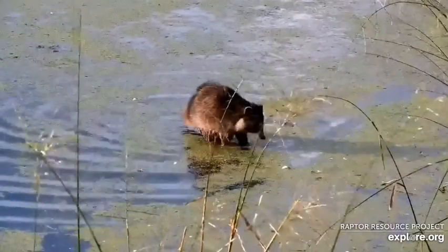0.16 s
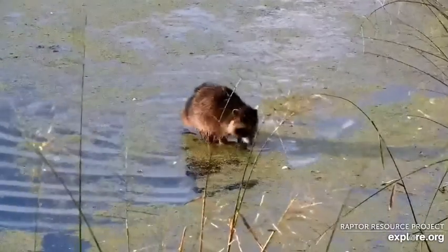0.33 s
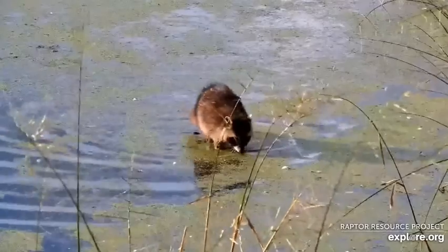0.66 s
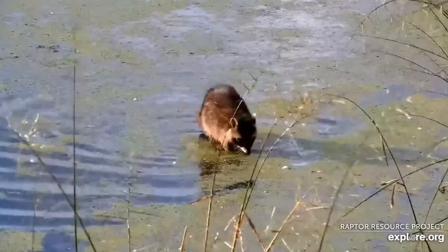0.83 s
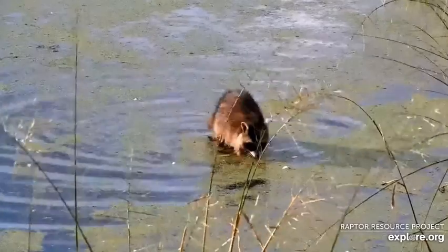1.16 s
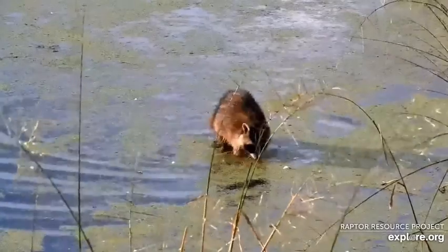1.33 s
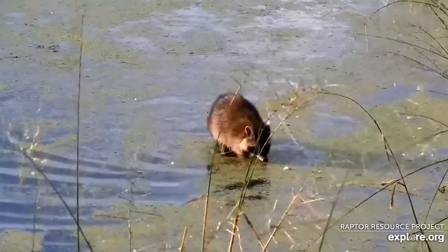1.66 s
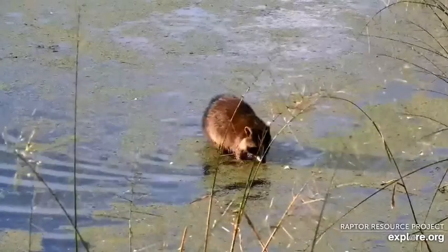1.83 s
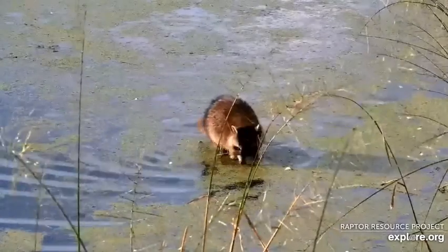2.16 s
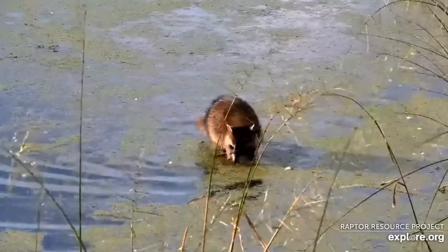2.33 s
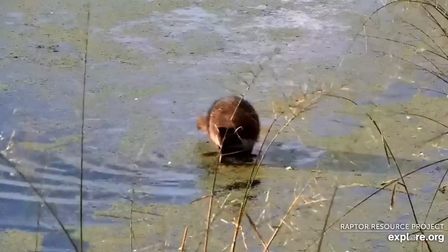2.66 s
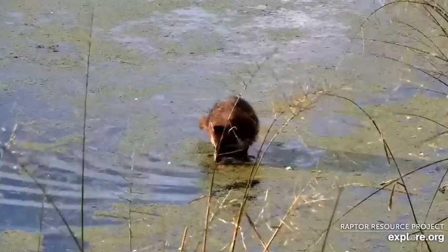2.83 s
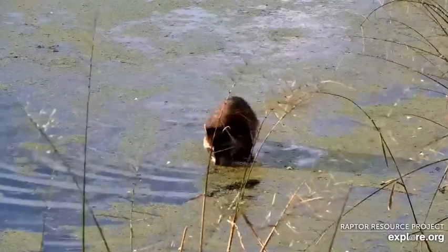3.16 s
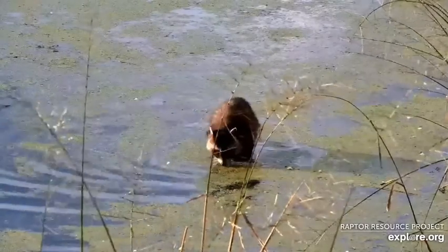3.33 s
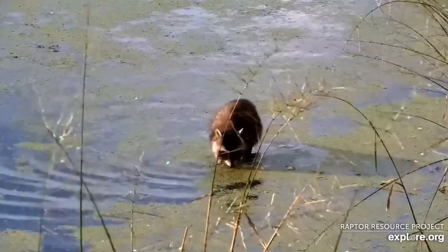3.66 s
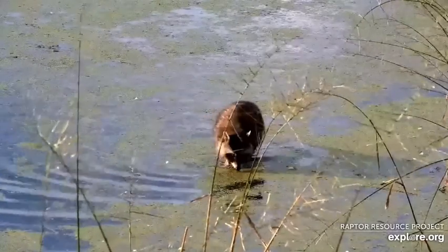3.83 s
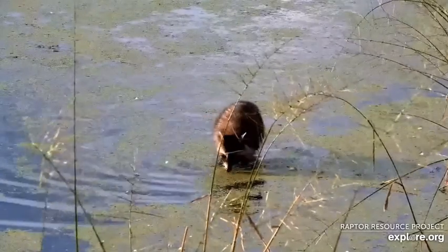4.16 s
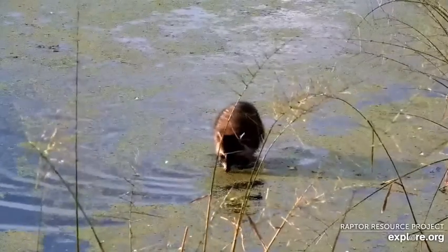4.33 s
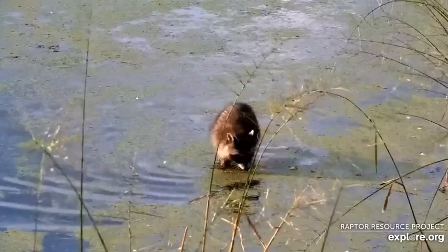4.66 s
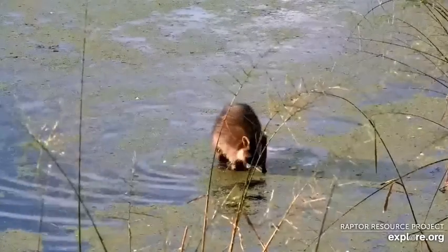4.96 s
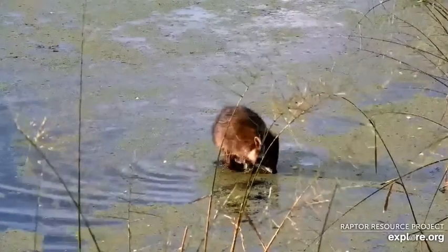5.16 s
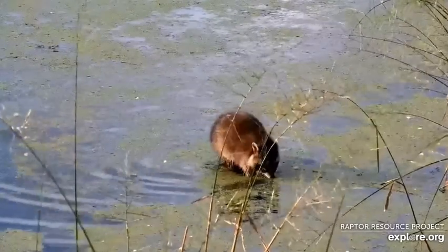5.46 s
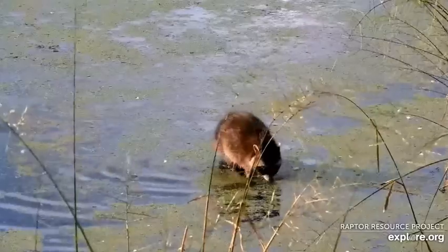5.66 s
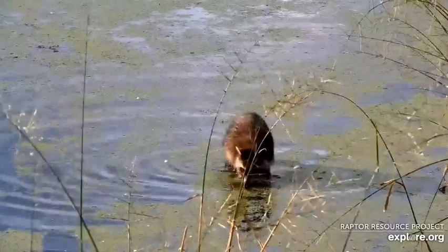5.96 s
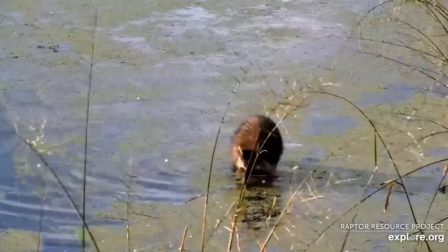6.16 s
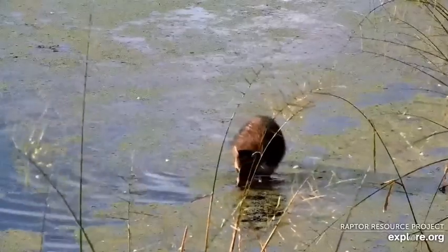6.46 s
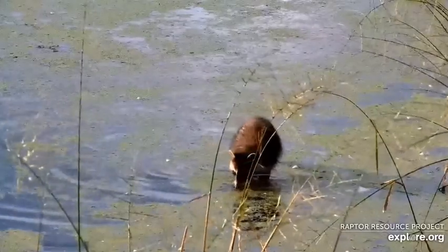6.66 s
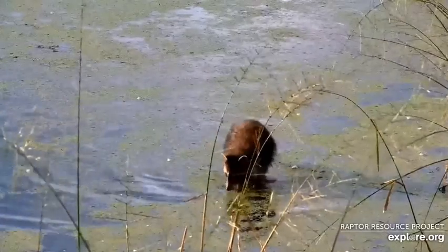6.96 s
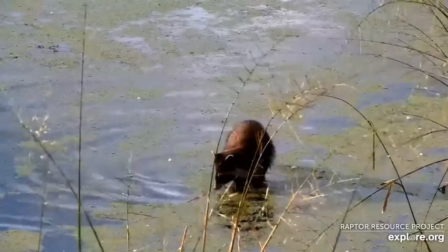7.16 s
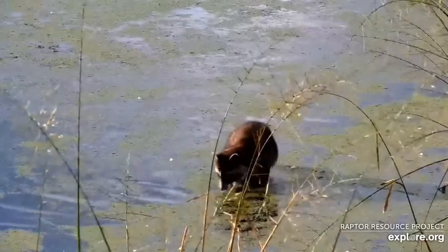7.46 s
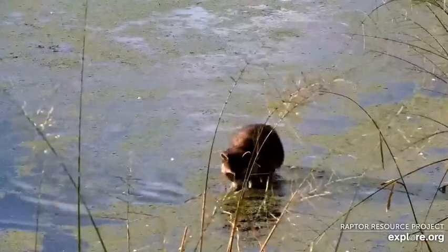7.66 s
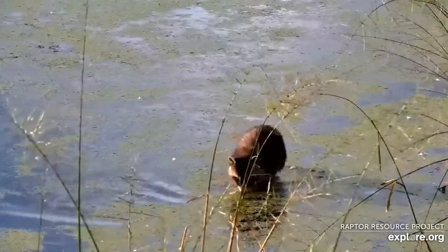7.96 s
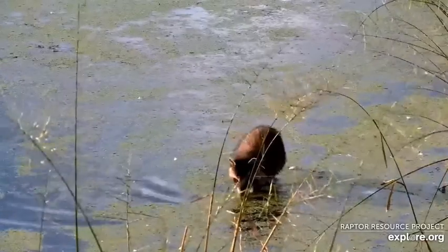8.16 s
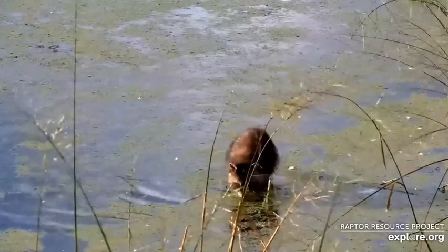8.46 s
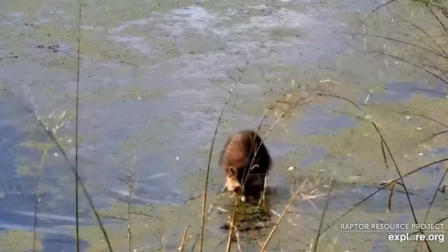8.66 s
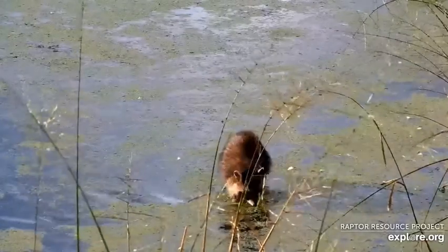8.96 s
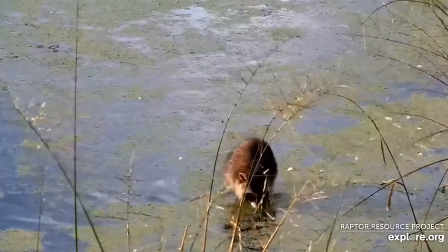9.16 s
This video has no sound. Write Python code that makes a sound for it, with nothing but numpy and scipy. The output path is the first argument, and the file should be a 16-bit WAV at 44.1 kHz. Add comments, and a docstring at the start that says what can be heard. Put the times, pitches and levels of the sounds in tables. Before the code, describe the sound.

A flock of geese calls on a river backwater, some distance from a fixed outdoor microphone. A strong honk opens at 0 s, followed by bright, short yelps near 0.45 and 0.95, then a brassier one just after 1. Notes last about a tenth of a second, many led by a hoarse, fluttering rasp. Calls are more spaced from 1.4 to 3.6, with clear yelps near 2.4 and 2.9; a small bird slurs a whistle downward at 1.5. From 3.7 the honks crowd together, high and low voices overlapping. Between 5.6 and 8.6 they turn rougher, with grunts and squawks. A loud blare at 8.75 runs into a longer low wail, then a few last honks after 9. Banks echo faintly; distant geese, soft swelling bass rumble, wavering hum and a very faint cricket trill continue throughout.

```python
"""A flock of geese honks on a river backwater, some way from a fixed outdoor microphone.
Many calls open as a hoarse rasp of flapping membranes, then snap into a clear note built from partials.
The wooded banks and the far shore echo them faintly, and more geese honk much further off.
A small bird gives slurred whistles and chips, a cricket trills thinly in falling wing strokes,
and filtered noise with a wavering hum makes the open air and its low rumble."""
import sys
import numpy as np
from scipy import signal
from scipy.fft import rfft, irfft, next_fast_len
from scipy.io import wavfile
from scipy.ndimage import map_coordinates

SR = 44100
rng = np.random.default_rng(int(sys.argv[2]) if len(sys.argv) > 2 else 0)


def master(y):
    """Save y as 16-bit WAV."""
    cut = np.clip(np.atleast_2d(y).T, -1, 1)
    pcm = np.round(cut * 32767)  # scale
    wavfile.write(sys.argv[1], SR, pcm.astype(np.int16))


N = 410130

# Shapes of a goose's note, by name. Each row: pitch at the start and at the end over the middle pitch,
# brightness in dB, edge of the partials above 5 kHz in dB, attack in seconds, sag of the level in dB,
# hoarseness from 0 to 1, flap rate of its rasp in Hz.
SHAPES = {"yelp": (1.02, .95, -.5, -6, .008, 8, .1, 270), "yip": (.995, .955, -1, -7, .01, 7, .05, 262),
          "whoop": (.935, .9, .5, -4, .011, 7, .15, 180), "croak": (.92, .89, 0, -5, .018, 4, .7, 176),
          "cluck": (.965, .915, -2, -4, .011, 6, .2, 215), "slide": (1.055, .935, -2, -5, .009, 7, .1, 178),
          "drawl": (.958, 1.022, -3, -2, .011, 6, .25, 175),
          "groan": (1.01, .975, -2, -4, .011, 6, .2, 172), "grunt": (1.02, .965, -4, -6, .009, 4, .8, 170),
          "bray": (.975, 1, 6.5, -14, .011, 5, 0, 180), "wail": (.965, 1.017, 6, 2, .011, 4, 0, 175),
          "blare": (.945, .96, 4.5, 0, .016, 3, 0, 172)}


def undb(db):
    """Decibels to gain."""
    return 10 ** (np.asarray(db) / 20)


def unit(x):
    """Scale to rms 1."""
    return x / np.sqrt(np.mean(x ** 2) + 1e-18)


def colour(x, points):
    """Filter by a spectrum of (Hz, dB) points, joined on a logarithmic frequency axis."""
    hz, db = np.transpose(points)
    size = next_fast_len(len(x))
    f = np.arange(size // 2 + 1) * SR / size
    gain = undb(np.interp(np.log(f + 1), np.log(hz), db))
    return irfft(rfft(x, size) * gain, size)[:len(x)]


def resonate(x, hz, width):
    """One resonance, gain 1 at its centre."""
    return signal.lfilter(*signal.iirpeak(hz, hz / width, fs=SR), x)


def resonate_twice(x, hz, width):
    """The same resonance passed twice, for steeper sides."""
    return resonate(resonate(x, hz, width), hz, width)


def walk(size, rate):
    """Smooth chance with spread near 1 and about rate turns a second."""
    knots = rng.standard_normal(2048)
    position = np.arange(size) * rate / SR
    return map_coordinates(knots, [position], order=1, mode="wrap") * np.sqrt(3 / 2)


def fade(size, rise_s, fall_s):
    """Envelope with rounded start and end."""
    t = np.arange(size) / SR
    rise = np.sin(np.pi / 2 * np.clip(t / rise_s, 0, 1))
    return rise * np.sin(np.pi / 2 * np.clip((t[-1] - t) / fall_s, 0, 1))


def add(out, s, x):
    """Mix x in at s seconds."""
    i = max(int(s * SR), 0)
    out[i:i + len(x)] += x[:max(N - i, 0)]


def background(air_db=-45.5, gust=.9, flicker_db=2.0, hum_hz=86.75, hum_db=-56, waver_db=-1.5):
    """Open air whose bass swells, a low hum that wavers, and far choruses that hang thinly."""
    # Relative spectrum of the open air. Each row: frequency in Hz, density in dB per Hz.
    air_spectrum = [(15, -20), (28, -4), (45, 1), (80, -2), (130, -5), (220, -11), (330, -16), (550, -20),
                    (900, -24), (1600, -37.5), (2000, -33.5), (4000, -46), (6600, -54.5), (7400, -58),
                    (10000, -65.5), (13000, -80)]
    # Rise and fall of the rumble about its mean. Each row: time in seconds, level in dB before scaling by gust.
    rumble = [(0, -44), (.5, -48), (1.6, -42.5), (1.9, -45), (2.5, -44.5), (3.3, -48), (4.6, -47),
              (4.85, -43.5), (5.1, -46), (5.7, -45.5), (6.1, -42), (6.55, -42), (7, -45), (7.75, -44),
              (8.2, -48), (9.3, -50)]
    # Steady bands, far geese then insects. Each row: frequency in Hz, width of each pass in Hz, level in dB.
    chorus = [(1467, 210, -67.5), (5970, 400, -87), (6490, 380, -86)]
    air = undb(air_db) * unit(colour(rng.standard_normal(N), air_spectrum))
    low = signal.sosfiltfilt(signal.butter(2, 300, fs=SR, output="sos"), air)
    when, db = np.transpose(rumble)
    swell_db = np.interp(np.arange(N) / SR, when, db)
    swell = undb(gust * (swell_db - swell_db.mean()))
    hum_phase = 2 * np.pi * np.cumsum(hum_hz * (1 + .012 * walk(N, 5))) / SR
    hum = np.sin(hum_phase) * undb(2.2 * walk(N, 4))
    out = low * swell + (air - low) * undb(flicker_db * walk(N, 6)) + undb(hum_db) * unit(hum)
    for hz, width, level_db in chorus:
        band = resonate_twice(rng.standard_normal(N), hz, width)
        out += undb(level_db + waver_db * walk(N, 13)) * unit(band)
    return out


def cricket(hz=4990, stroke_hz=65.1, fall=.09, db=-78.8, neighbours_db=-79.2):
    """A thin trill: every wing stroke is a short falling tone; others further off blur into a band."""
    stroke = np.cumsum(stroke_hz * (1 + .006 * walk(N, 2.7))) / SR % 1
    pitch = hz * (1 - fall * (stroke - .5) + 0.026 * walk(N, 90))
    tone = np.sin(2 * np.pi * np.cumsum(pitch) / SR)
    trill = tone * np.sin(np.pi * stroke) ** 4 * undb(2.0 * walk(N, 50))
    neighbours = resonate_twice(rng.standard_normal(N), hz, 730)
    return undb(db) * unit(trill) + undb(neighbours_db) * unit(neighbours)


def small_bird(chip_s=0.014, chip_fall=.2):
    """Nearly pure whistles that slur mostly downward, and tiny falling chips."""
    # One slurred chirp. Each row: seconds after its start, pitch in Hz before the chirp's factor, relative dB.
    slur = [(0, 3050, -10), (.014, 3310, 5), (.038, 2720, 3), (.064, 2580, -1), (.078, 2700, 5),
            (.116, 2300, -8)]
    # Its chirps. Each row: start in seconds, share of the full length, pitch factor, level in dB.
    chirps = [(1.526, 1, 0.98, -54), (5.806, 0.55, 0.98, -63), (7.585, 0.75, .97, -70)]
    # Short, faint chips. Each row: start in seconds, middle pitch in Hz, peak level in dB.
    chips = [(2.25, 3260, -62), (3.228, 3300, -64), (3.264, 4300, -69), (5.525, 3000, -65),
             (8.168, 2760, -62)]
    out = np.zeros(N)
    when, hz, db = np.transpose(slur)
    for s, share, pitch, level_db in chirps:
        t = np.arange(int(when[-1] * share * SR)) / SR
        phase = 2 * np.pi * np.cumsum(pitch * np.interp(t, when, hz)) / SR
        level = undb(level_db + np.interp(t, when, db))
        add(out, s, np.sin(phase) * level * fade(len(t), .004, .008))
    u = np.linspace(-.5, .5, int(chip_s * SR))
    for s, chip_hz, level_db in chips:
        phase = 2 * np.pi * np.cumsum(chip_hz * (1 - chip_fall * u)) / SR
        add(out, s, undb(level_db) * np.hanning(len(u)) * np.sin(phase))
    return out


def banks(x, t60_s=0.58, level_db=-16.5, first_s=0.035, patchy_db=3):
    """Trees along the shore scatter the calls back in uneven, dull clumps."""
    t = np.arange(SR) / SR
    decay = undb(-60 * t / t60_s + patchy_db * walk(SR, 40))
    tail = rng.standard_normal(SR) * decay * np.clip(t / first_s, 0, 1)
    tail = colour(tail, [(300, 5), (700, -8), (1100, -4), (1500, -6), (2500, -3), (6000, -6)])
    return undb(level_db) * signal.fftconvolve(x, tail / np.linalg.norm(tail))[:N]


def shore(x, delay_s=.27, level_db=-30):
    """One late, dull echo from across the water."""
    out = np.zeros(N)
    dull = signal.sosfilt(signal.butter(2, 2200, fs=SR, output="sos"), x)
    add(out, delay_s, undb(level_db) * dull)
    return out


def honk(length, pitches, levels, upper_db, edge_db, rise_s=.011, sag_db=7, hoarse=0, jitter=0.0022,
         shimmer_db=1.4, flutter=0.09, even_db=2.5, open_s=.1):
    """A clear note of partials: the pitch bends, then droops as the level sags and the push of air runs out."""
    # Colour of the overtones that leave the open bill. Each row: frequency in Hz, relative level in dB.
    bill = [(2000, 0), (2650, -7), (2950, -3), (3550, -.5), (4150, 3), (4700, -1.5), (5400, -3), (6000, -6),
            (6700, -22), (8500, -41), (12000, -49)]
    droop, droop_s = .05, .013  # share of the pitch, time constant in s
    hoarse_jitter = .016  # a fully hoarse note wavers more, by this share of its pitch
    edge_hz = 5000
    size = int((length + .004) * SR)
    u = np.arange(size) / SR / length
    bend = np.polyval(np.polyfit([0, .5, 1], pitches, 2), u)
    hz = bend * (1 - droop * np.exp((u - u[-1]) * length / droop_s))
    phase = 2 * np.pi * np.cumsum(hz * (1 + (jitter + hoarse_jitter * hoarse) * walk(size, 260))) / SR
    bill_hz, bill_db = np.transpose(bill)
    orders = np.arange(4, 13)
    upper_hz = orders * pitches[1]
    # among the upper partials the even ones are favoured
    colour_db = np.interp(upper_hz, bill_hz, bill_db) - even_db * (orders % 2)
    upper = undb(colour_db + edge_db * (upper_hz > edge_hz))
    gains = np.concatenate([undb(levels), undb(upper_db) * upper / np.linalg.norm(upper)])
    body = unit(fade(size, rise_s, 0.028) * undb(-sag_db * u ** 1.5))
    # the upper partials come out as the bill opens, later in a longer note
    gape = np.sin(np.pi * np.clip(u, 0, 1) ** (length / open_s))
    opening = unit(np.sqrt(gape + 1e-9) * fade(size, rise_s, .02))
    tone = np.zeros(size)
    for k, gain in enumerate(gains, 1):
        envelope = opening if k >= orders[0] else body
        shimmer = undb(shimmer_db * np.sqrt(k / 2) * walk(size, 70))  # higher partials waver more
        tone += gain * envelope * np.sin(k * phase) * shimmer
    return np.sqrt(2) * tone * (1 + flutter * walk(size, 700))


def far_geese(db=-66, count=45):
    """More of the flock honks at random, much further off."""
    out = np.zeros(N)
    for when, pitch, length, quietness in rng.random((count, 4)):
        pitches = (500 + 280 * pitch) * np.array([.98, 1, .94])
        note = honk(.08 + 0.061 * length, pitches, [-2, 0, -18], -32, -6)
        add(out, when * N / SR, undb(db - 5 * quietness) * note)
    return out


def smear(x, longest_s=.0035):
    """Spread each flap over a few milliseconds by a random delay per frequency, so a rasp is less clicky."""
    size = next_fast_len(len(x) + 1024)
    spectrum = rfft(x, size)
    delay = np.interp(np.linspace(0, 127, len(spectrum)), np.arange(128), rng.random(128)) * longest_s
    # summing the delay over frequency gives the phase
    return irfft(spectrum * np.exp(-2j * np.pi * np.cumsum(delay) * SR / size), size)[:len(x)]


def rasp(length, flap_hz, db, throat_db, gape_db, swell_db=0, throb_db=1.5, closed_db=-2):
    """Uneven flaps of the syrinx and a little rushing air ring the windpipe, the throat and the open bill."""
    # Resonances of a goose's long windpipe, before each bird's own length shifts them.
    # Each row: frequency in Hz, width in Hz, level in dB.
    windpipe = [(520, 160, 1.5), (715, 190, 3.5), (1125, 230, 2.5), (1370, 170, 4.5), (1551, 180, -2.5),
                (2180, 350, -12)]
    # Resonances in the throat, shifted likewise. Each row: frequency in Hz, half the width of each pass in Hz,
    # level in dB.
    throat_modes = [(1900, 110, -3), (2170, 110, 0), (2650, 150, -9.5)]
    # Higher ones that a wide-open bill lets out, with the same columns: frequency in Hz, half-width in Hz, dB.
    gape_modes = [(3450, 140, -6), (3900, 140, -1), (4350, 150, 0), (4850, 160, -4), (5500, 220, -9)]
    jitter, scatter, rebound, hiss, tighten = .035, .45, .3, .09, .08
    throb_hz, closed_hz = 115, 1150  # mean rate of the air bursts, middle of the windpipe's ring
    pipe_spread, arch = .025, .06  # shares of the frequency
    size = int((length + .018) * SR)
    u = np.linspace(0, 1, size)
    # the membranes speed up as they tighten; each slow flap is followed by a weaker rebound
    hz = 2 * flap_hz * (1 + tighten * (u - .5) + jitter * walk(size, 350))
    beat = np.floor(np.cumsum(hz) / SR)
    strength = np.where(beat % 2, 1, rebound * (1 + .5 * np.tanh(walk(size, 90))))
    strength = strength * (1 + scatter * np.tanh(walk(size, 350)))
    # the air comes in little bursts, which deepen along the rasp
    throb = np.sin(2 * np.pi * np.cumsum(throb_hz * (1 + .2 * walk(size, 100))) / SR)
    bursts = undb(throb_db * 2 * u * throb)
    flaps = unit(np.diff(beat, prepend=0) * strength)
    drive = smear((flaps + hiss * rng.standard_normal(size)) * bursts)
    # every rasp draws its own windpipe length
    pipe = 1 + pipe_spread * np.tanh(rng.standard_normal())
    body = np.zeros(size)
    for k, (f, width, level_db) in enumerate(windpipe):
        # the ring starts near its middle and broadens as the bill opens
        closing_db = closed_db * abs(np.log2(f / closed_hz)) * (1 - u ** 2)
        body += (-1) ** k * undb(level_db + closing_db) * resonate(drive, f * pipe, width)
    body = signal.sosfilt(signal.butter(6, [400, 1720], "bandpass", fs=SR, output="sos"), body)
    throat = sum(undb(g) * resonate_twice(drive, f * pipe, 2 * w) for f, w, g in throat_modes)
    gape = sum(undb(g) * resonate_twice(drive, f * pipe, 2 * w) for f, w, g in gape_modes)
    gape = signal.sosfilt(signal.butter(6, 6000, fs=SR, output="sos"), gape)
    # the throat rings throughout; the harsh top comes only near the height of the effort
    effort = np.sin(np.pi * u)
    shape = fade(size, .028, .026) * undb(swell_db * u ** 2)
    sound = undb(db) * unit(body * shape)
    sound += undb(throat_db) * unit(throat * np.sqrt(np.abs(effort)) * shape)
    sound += undb(gape_db) * unit(gape * effort ** 2 * shape)
    # uneven playing speed arches the resonances up and down with the effort
    return map_coordinates(sound, [np.cumsum(1 + arch * (effort - effort.mean()))], order=3)


def call(shape, length, hz, db, octave_db, third_db):
    """One note: its shape bends the pitch, the first two partials share the level, the overtones follow it."""
    start, end, bright_db, edge_db, rise_s, sag_db, hoarse, _ = SHAPES[shape]
    first = db - 10 * np.log10(1 + undb(octave_db) ** 2)
    # upper partials grow with the brassiness of the third; low notes are duller, by 13 dB per octave
    upper = db - 22.8 + bright_db + .53 * third_db + 13 * np.log2(hz / 740)
    levels = [first, first + octave_db, db + third_db]
    return honk(length, [hz * start, hz, hz * end], levels, upper, edge_db, rise_s, sag_db, hoarse)


def geese(rasp_db=0.6):
    """The nearer birds: notes, many led in by a rasp, and squawks that stay hoarse between them."""
    # Calls. Each row: start of the note in seconds, shape, length in seconds, middle pitch in Hz, level in dB,
    # second partial over the first in dB, third partial over the note in dB; if a rasp leads in, also
    # its lead in seconds and its level in dB before the trim rasp_db.
    calls = [ (0, "whoop", .1, 767, -35.3, 1.5, -26), (.05, "slide", .078, 772, -41.5, -4, -15),
             (.07, "groan", .26, 505, -52, -12, -20), (.161, "drawl", .1, 545, -52, 12, -20),
             (.443, "yelp", .07, 738, -32.8, 5, -24, .068, -42), (.515, "cluck", .127, 636, -42, 6.5, -16),
             (.78, "groan", .25, 500, -56.5, -15, -20),
             (.931, "yelp", .07, 733, -33.5, 3.5, -26, .057, -44.5),
             (1.02, "whoop", .09, 778, -36.5, 5.5, -29), (1.049, "bray", .134, 717, -36.5, 4, -21.5),
             (1.168, "slide", .083, 606, -48.5, -5, -16), (1.243, "yip", .098, 715, -55, -9, -25),
             (1.44, "slide", .081, 725, -38, 2.5, -28, .055, -44.5),
             (1.524, "drawl", .1, 540, -55, 7.5, -14), (1.58, "groan", .125, 672, -62, 14, -22),
             (1.8, "drawl", .18, 555, -55, -14, -14), (1.897, "yip", .063, 805, -42.5, -8, -28, .045, -43),
             (1.924, "yelp", .068, 718, -40.5, -5.5, -27), (1.932, "cluck", .1, 620, -45, 4, -29),
             (2.42, "yelp", .081, 738, -35.2, 3, -33, .049, -46),
             (2.659, "yip", .08, 646, -40, 10, -35, .028, -50),
             (2.903, "yelp", .075, 748, -33.3, 3.5, -29, .088, -41),
             (2.93, "cluck", .075, 770, -43.5, 7, -22),
             (3.386, "yelp", .079, 739, -40.5, -4, -34, .043, -52), (3.64, "drawl", .08, 562, -53, 12, -20),
             (3.71, "cluck", .094, 790, -43, -5, -17), (3.72, "cluck", .075, 700, -49, 10, -14),
             (3.851, "yip", .09, 755, -37, 5.5, -34, .025, -50.5), (4.0, "drawl", .16, 480, -51, -9, -20),
             (4.035, "cluck", .1, 626, -43, 8.5, -20, .034, -45.5),
             (4.134, "whoop", .12, 762, -36.5, 9.5, -27, .02, -45), (4.19, "drawl", .1, 524, -51, 6, -20),
             (4.298, "yip", .086, 741, -36.5, 8, -40, .03, -46),
             (4.644, "yelp", .068, 738, -37, 4, -32, .083, -47), (4.675, "groan", .1, 808, -45.5, 6, -26),
             (4.692, "cluck", .13, 700, -49, 3, -16), (4.876, "yip", .096, 632, -42, 3.5, -22, .016, -48),
             (5.077, "yip", .067, 732, -37.3, 4.5, -38, .064, -43.5),
             (5.012, "yip", .028, 752, -46, 5, -25), (5.03, "drawl", .05, 530, -50, -10, -15),
             (5.23, "groan", .12, 482, -49, -11, -20),
             (5.23, "whoop", .122, 768, -36.7, 2.5, -26, .05, -45),
             (5.403, "yelp", .076, 733, -37.5, -1, -33, .008, -47),
             (5.59, "grunt", .055, 468, -49, -6, -15), (5.62, "drawl", .06, 525, -53, 8, -15),
             (5.686, "whoop", .1, 795, -41.5, 2, -25), (5.693, "croak", .11, 700, -43.5, 15, -24),
             (5.843, "yip", .078, 732, -38, 7, -32), (5.893, "grunt", .03, 505, -44, 3, -15),
             (5.912, "yelp", .07, 667, -49, -2, -24), (5.93, "croak", .075, 712, -51, 9, -20),
             (5.995, "grunt", .054, 505, -49.5, -2, -14, .02, -50), (6.15, "whoop", .055, 835, -61, 5, -25),
             (6.208, "yip", .025, 738, -51, 9, -25), (6.268, "yip", .09, 725, -41, 5, -35, .05, -48.5),
             (6.345, "cluck", .085, 740, -47.5, -4, -28),
             (6.422, "slide", .087, 514, -45, 1, -16, .035, -48),
             (6.686, "yelp", .085, 728, -41, 4.5, -30, .04, -47), (6.825, "croak", .12, 545, -47, -4, -12),
             (6.867, "yelp", .07, 800, -44, 3, -25), (6.876, "cluck", .075, 690, -41, 10.5, -20),
             (7.003, "drawl", .11, 497, -57, 9, -15), (7.15, "croak", .088, 792, -43.5, 0, -24, .024, -49),
             (7.2, "drawl", .075, 545, -56, 10, -12), (7.272, "whoop", .09, 757, -41, -1, -32, .006, -47),
             (7.349, "groan", .06, 686, -38.5, 3, -27, .015, -45), (7.365, "grunt", .1, 590, -46, 6, -20),
             (7.399, "grunt", .05, 512, -38.5, -1, -14), (7.437, "grunt", .045, 714, -43, 2, -22),
             (7.44, "drawl", .04, 660, -42, 8, -16), (7.447, "cluck", .102, 686, -44.5, 9, -19),
             (7.56, "drawl", .08, 525, -51.5, -7, -2), (7.619, "yip", .075, 735, -47.5, 6, -30),
             (7.68, "slide", .07, 665, -53, -10, -25), (7.878, "croak", .048, 575, -39, 7, -15, .054, -43),
             (7.911, "drawl", .075, 505, -43, -3, -12), (7.915, "croak", .066, 785, -41, 5, -27),
             (7.967, "groan", .08, 515, -40.5, 0, -12), (7.992, "cluck", .1, 782, -43.5, 0, -25),
             (8.02, "yelp", .08, 732, -41, 10, -22), (8.36, "drawl", .045, 790, -52, 10, -25),
             (8.28, "slide", .07, 480, -56, 10, -20), (8.418, "groan", .045, 515, -45, -10, -12, .05, -47),
             (8.437, "grunt", .06, 724, -39.5, 3, -26), (8.502, "whoop", .1, 792, -42, -2, -28, .075, -44),
             (8.705, "groan", .06, 495, -49, -9, -15),
             (8.749, "blare", .12, 667, -33, 11.5, -17, .039, -42),
             (8.815, "wail", .225, 517, -39.5, 0, -18, .04, -48), (9.057, "yip", .077, 777, -46, -15, -30),
             (9.131, "whoop", .095, 793, -40.5, 0, -24, .08, -43), (9.21, "groan", .12, 536, -54.5, 1, -14)]
    # Harsh squawks. Each row: time in seconds, length in seconds, flap rate in Hz, then the levels of
    # windpipe, throat and open bill in dB before the trim rasp_db.
    squawks = [(0, .14, 260, -48, -68, -72), (.825, .03, 240, -58, -69, -80),
               (.995, .07, 205, -39.5, -62, -65), (1.799, .13, 185, -52, -70, -79),
               (2.753, .075, 182, -51, -66, -85), (2.812, .08, 270, -45, -61, -73),
               (3.608, .035, 250, -51, -70, -83), (3.685, .095, 198, -47.5, -63, -67),
               (4.564, .04, 190, -52, -68, -82), (4.632, .11, 205, -46, -60, -66),
               (5.15, .075, 165, -49.5, -76, -87), (5.579, .05, 170, -49.5, -68, -81),
               (5.655, .135, 190, -50, -63, -73), (5.816, .11, 176, -47, -66, -80),
               (6.83, .12, 178, -46, -59, -66), (7.123, .06, 172, -47, -68, -81),
               (7.27, .08, 170, -48, -71, -81), (7.35, .06, 172, -44.5, -65, -78),
               (7.405, .07, 172, -43.5, -62, -74), (7.75, .03, 245, -49, -64, -79),
               (7.772, .07, 168, -49, -70, -83), (7.86, .075, 188, -41.5, -60, -59),
               (7.928, .12, 172, -52, -65, -72), (8.43, .06, 185, -45, -65, -79),
               (8.63, .075, 175, -48, -74, -87), (9.21, .1, 180, -49.5, -75, -88)]
    out = np.zeros(N)
    for s, shape, length, hz, db, octave_db, third_db, *opening in calls:
        *_, hoarse, flap_hz = SHAPES[shape]
        add(out, s, call(shape, length, hz, db, octave_db, third_db))
        # no note is quite clean: a trace of rasp runs beneath it, stronger in a hoarse one
        under_db = db - 24 + 13 * hoarse
        add(out, s, rasp(length, flap_hz, under_db, under_db - 21, db - 46, swell_db=-5))
        if opening:
            # the leading rasp swells into its note and hangs on a little
            lead_s, lead_db = opening
            lead = rasp(lead_s + .007, flap_hz, lead_db, lead_db - 29, lead_db - 38,
                        swell_db=8, throb_db=4, closed_db=-11)
            add(out, s - lead_s - .008, undb(rasp_db) * lead)
    for s, length, flap_hz, db, throat_db, gape_db in squawks:
        add(out, s - .01, undb(rasp_db) * rasp(length, flap_hz, db, throat_db, gape_db))
    return out


def scene():
    """Birds, their echoes, a cricket and the background at one microphone."""
    birds = geese() + far_geese() + small_bird()
    return (birds + banks(birds) + shore(birds) + cricket() + background())[None]


def record(dry):
    """The recorder cuts the top above 12.5 kHz."""
    return signal.sosfilt(signal.ellip(8, .2, 70, 12500, fs=SR, output="sos"), dry)


dry = scene()
out = record(dry)
master(out)
```